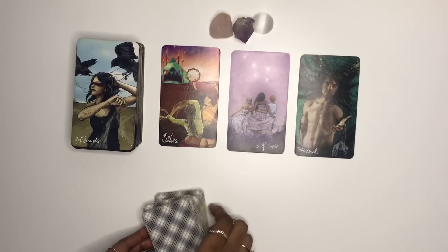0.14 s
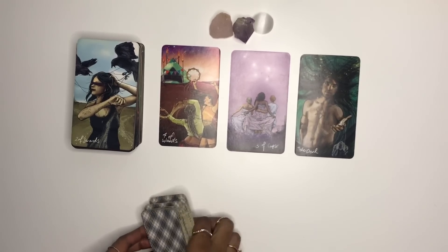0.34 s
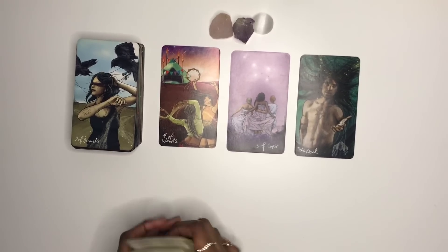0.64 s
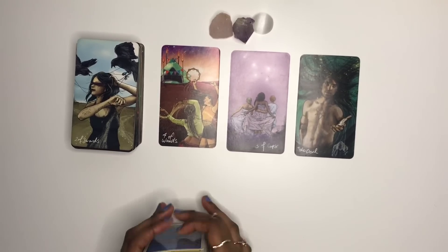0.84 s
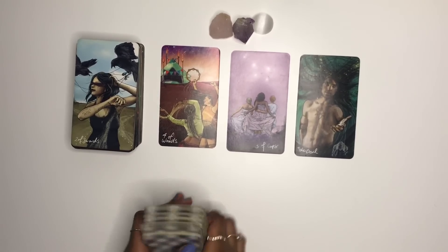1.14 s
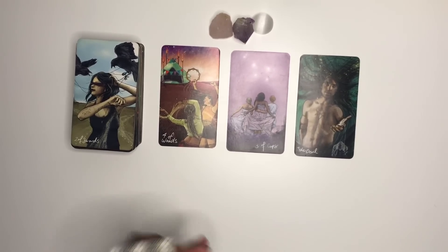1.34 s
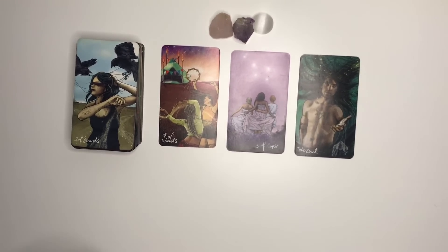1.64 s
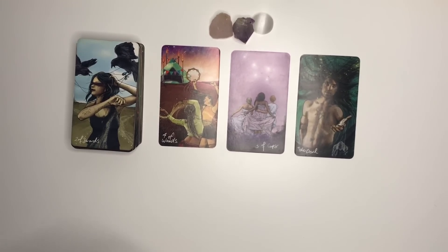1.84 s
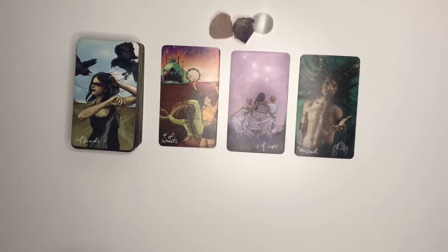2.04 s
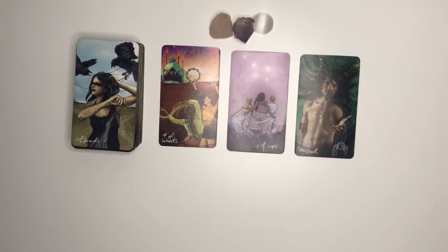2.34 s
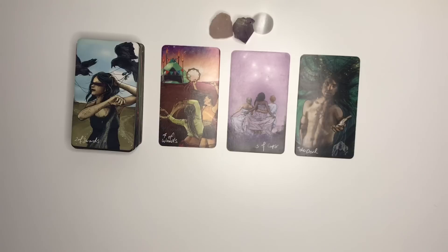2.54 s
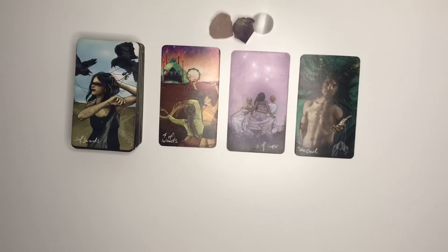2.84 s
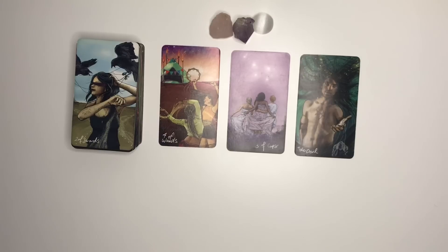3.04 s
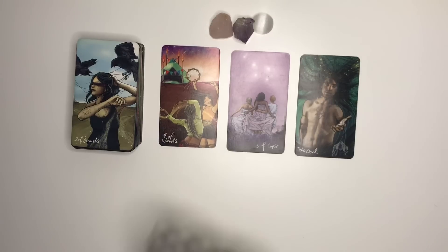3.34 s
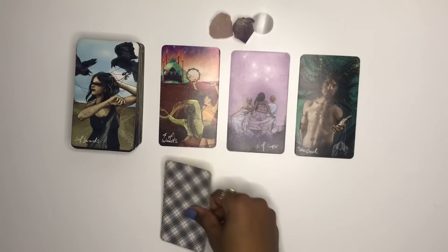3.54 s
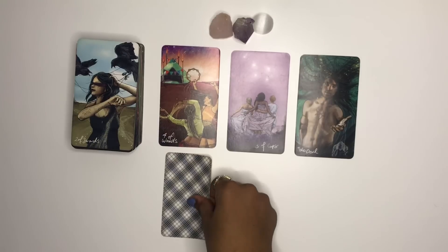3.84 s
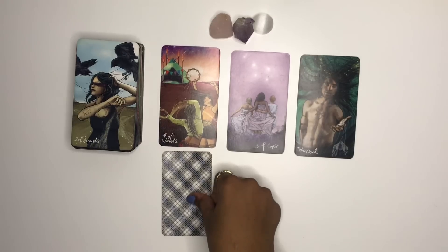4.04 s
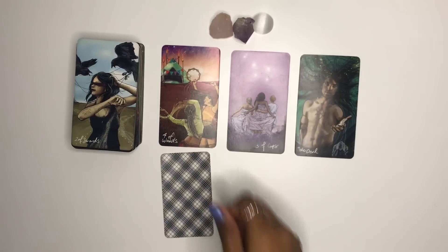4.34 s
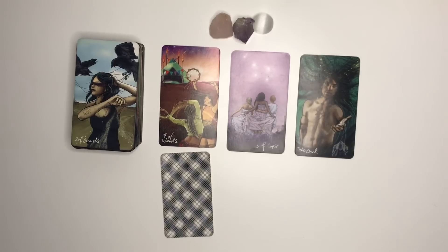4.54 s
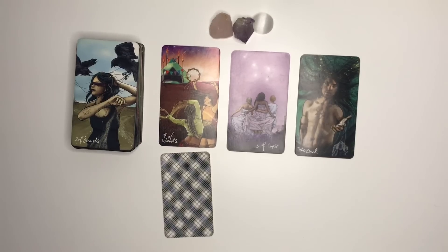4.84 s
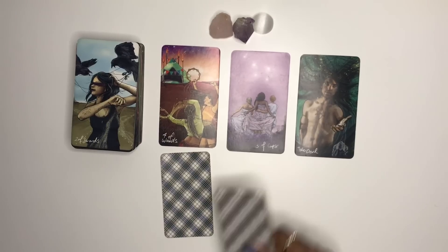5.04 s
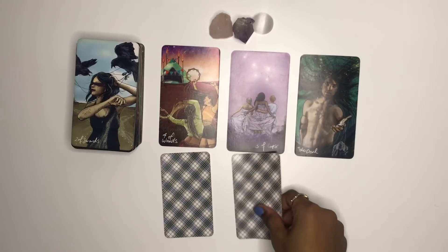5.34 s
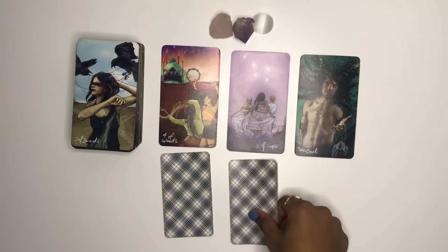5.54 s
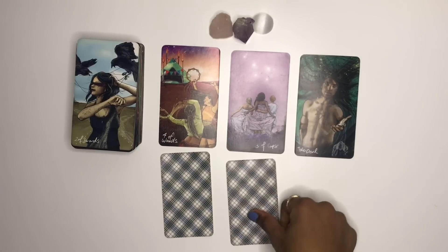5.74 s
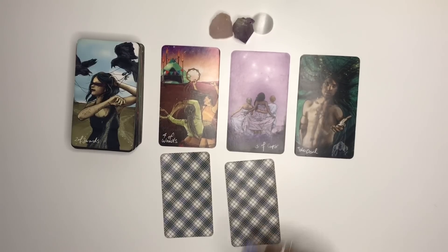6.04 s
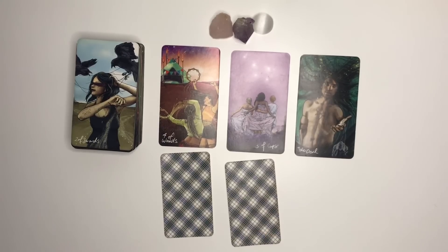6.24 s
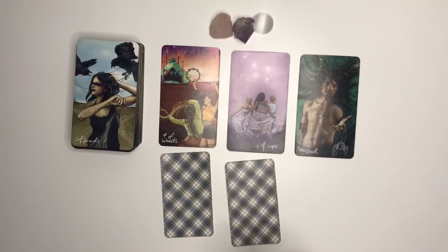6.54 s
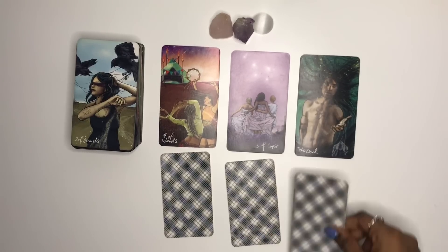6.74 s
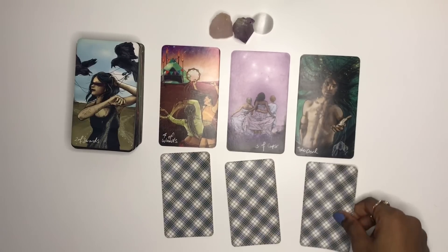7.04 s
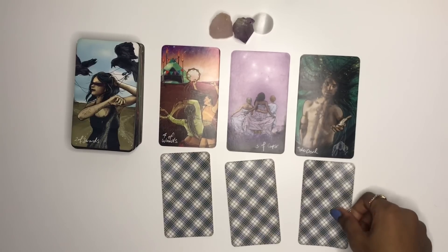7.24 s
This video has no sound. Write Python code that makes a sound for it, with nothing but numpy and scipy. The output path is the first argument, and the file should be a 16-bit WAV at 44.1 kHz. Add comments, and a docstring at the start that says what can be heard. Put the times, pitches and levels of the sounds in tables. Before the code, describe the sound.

A small, still room with low rumble and faint hiss, heard close. From 0 to 0.7 seconds a deck of large cards is handled: soft rubs, dull low bumps, tiny clicks. At about 0.83 its edges land on the table in a loud clatter with a thump, and again, brighter, at 1.04, followed by papery rubs and a light tick at 1.4. Three short hard knocks on the deck come at 1.9, 2.1 and 2.3. Near quiet follows until a sharp snap at 3.3 as a card springs free; it touches down near 3.6, ticks brightly at 3.75 and 3.87, slides faintly and is pressed at 4.05. Small catches at 4.4 to 4.7 precede a softer, hollow snap at 4.95; that card lands at 5.2 and is pressed at 5.8. A third strong snap at 6.55, landing at 6.9, stuttering ticks from 7.1, and a loud click at 7.28 before the final press.

```python
"""A deck of large cards is handled at a table in a small, quiet room, close to the microphone.
The deck is squared on the tabletop and knocked three times; three cards are then drawn with a snap,
slid into place and pressed down. Cracks, clatter and rubs are shaped, filtered noise; cards, deck, palm
hollow and tabletop ring as damped modes. A short echo and a low rumble with faint hiss complete the room."""
import sys
import numpy as np
from scipy import signal
from scipy.fft import rfft, irfft
from scipy.io import wavfile
from scipy.ndimage import uniform_filter1d

SR = 44100
rng = np.random.default_rng(int(sys.argv[2]) if len(sys.argv) > 2 else 0)


def dump_mix(stems):
    """Bounce the given channels to the path in sys.argv[1] as a 16-bit WAV at rate SR."""
    frames = np.atleast_2d(stems).T  # one column per channel
    limited = np.clip(frames, -1, 1)  # hard clip at full scale
    pcm = np.round(limited * 32767).astype(np.int16)
    wavfile.write(sys.argv[1], SR, pcm)


N = 325437

# Levels within a spectrum or a set of modes are relative.
# Background of the still room: pitch_hz, level_db
HUSH_SPECTRUM = [(15, -38), (25, -18.5), (48, 4), (97, -5.5), (134, -1.5), (249, -13.5), (301, -11),
                 (531, -18), (591, -13.5), (775, -18.5), (1020, -20), (2050, -24.5), (2610, -26),
                 (6740, -30.5), (16000, -34)]
HUSH_DB = -50

# Cards rub over each other, or briefly scrape on the table: fastest_s, level_db, rise_s
RUBS = [(.02, -51.5, 0.046), (.262, -43.5, 0.05), (.461, -47, 0.023), (0.564, -48, 0.063),
        (.685, -45.5, 0.031), (0.735, -31, 0.018), (1.12, -36.5, 0.069), (1.189, -35.5, 0.0074),
        (1.256, -45.5, 0.016), (1.349, -37, .019), (1.501, -53, .06), (2.985, -47.5, 0.041),
        (3.17, -51, 0.061), (3.247, -38, .012), (4.625, -38, 0.016), (5.24, -46, 0.027), (5.542, -39, .012),
        (6.11, -49.5, 0.051)]
# Friction of a rubbing card: pitch_hz, level_db
PAPER_SPECTRUM = [(150, -22), (400, -7), (650, 3), (1300, -4.5), (2000, 0.5), (4000, 0), (7000, -5),
                  (10500, -9.5), (14000, -6.5), (16000, -15)]
RUB_FALL = 0.72  # a stroke's fall time as a share of its rise
# Lighter strokes hiss thinner: tilt in dB per octave, plus RUB_THINNING for each dB under RUB_REF_DB
RUB_TILT_DB, RUB_REF_DB, RUB_THINNING = 0.5, -45.5, 0.17

# Deck and hands bump the table: start_s, level_db, best_driven_hz, falloff_db_per_octave to either side
BUMPS = [(.022, -31, 122, 8), (.156, -23, 164, 10.5), (.192, -43, 200, 2), (.282, -29.5, 118, 11.5),
         (.829, -11, 167, 11), (0.846, -20.5, 155.7, 10), (0.878, -26, 175, 24.5), (0.995, -32.5, 310, 22),
         (1.131, -34, 160, 7.5)]
# Modes of the tabletop: pitch_hz, level_db, t60_s
TABLE_MODES = [(61.1, -12.5, 0.32), (93.5, -11, 0.078), (117.8, -2, 0.17), (150, -9, 0.2),
               (176.9, -1, 0.25), (263.6, -9, 0.19), (314, -8.5, 0.26), (389.5, -6, 0.14)]
# Dull pat of a blow of the hand: pitch_hz, level_db
PAT_SPECTRUM = [(120, -10), (300, -4), (560, -8.5), (750, -5), (1100, -20.5), (2000, -19.5), (6000, -53)]

# Fingers catch on the deck's edge: start_s, level_db, tilt_db_per_octave
CATCHES = [(.382, -45, -0.5), (.5225, -35, 10.5), (0.5289, -35.5, 9), (2.845, -48, -5),
           (3.2957, -28.5, 3.5), (4.4386, -40, -1), (4.6125, -29, 1), (4.666, -31.5, 5.5),
           (4.9122, -20.5, -3), (4.9565, -23, -0.5), (6.2678, -37.5, 1.5), (6.2805, -31, 0),
           (6.525, -31.5, 6)]
# A bright catch pops less: POP_LOSS dB for each dB per octave of tilt
CATCH_CRACK_DB, CATCH_POP_DB, CATCH_POP_HZ, POP_LOSS = 2.5, 11, 592, 1
# Modes of a flexing card: pitch_hz, level_db, t60_s
CARD_MODES = [(1046, 3, 0.0067), (1400, -34.5, 0.018), (1790, 2, 0.012), (3530, 10, 0.0016),
              (3980, -45, 0.011), (6170, 6, 0.0037)]
# Modes of the hollow between palm and deck: multiple_of_pop_pitch, level_db, t60_s
HAND_MODES = [(.7, -2, 0.01), (1, 3.5, 0.011), (1.25, -13, 0.022)]
# Crack of a sudden release or blow: pitch_hz, level_db
CRACK_SPECTRUM = [(100, -28), (300, -12), (1000, -4.5), (3000, 2.5), (5000, -1), (7000, -4), (10000, -13),
                  (13000, -10.5), (16000, -16)]

# The deck's edges land on the table: peak_s, level_db, landing_spread_s, tilt_db_per_octave
LANDINGS = [(0.8274, -11, 0.0028, -3.5), (0.8396, -3, 0.0023, -1), (.8455, -19.5, 0.0026, 9),
            (0.856, -21.5, 0.0087, 1), (0.865, -41, 0.0037, 15), (1.04, -7.5, 0.0032, 4),
            (1.052, -9, 0.0038, 5.5), (1.062, -26, 0.024, -5.5)]
# Contact of card edges with the table: pitch_hz, level_db
EDGE_SPECTRUM = [(100, -6), (300, -5.5), (450, -8.5), (750, 3.5), (1400, -4), (2100, 5.5), (3200, -4),
                 (4600, -11.5), (6500, -23), (9000, -44), (16000, -54)]

# Single ticks of a card's edge: start_s, level_db, main_ring_hz, crack_db, second_ring_db
TICKS = [(1.149, -32.5, 6400, -12, -10), (1.4246, -25, 6580, 3, 7), (1.4862, -46, 8400, 6, -18),
         (1.6335, -51.5, 5000, 12, 1), (2.5762, -51, 7540, 14, -5), (3.7396, -12, 3840, -16, -13.5),
         (3.8361, -32, 3220, -13, -22), (3.8686, -13.5, 3230, -8.5, -15.5), (5.492, -33, 3260, -21, -30),
         (5.5451, -23.5, 3150, -16, -17), (7.2756, -7, 4040, -17, -11.5)]
# Scuff of an edge: multiple_of_main_ring, level_db
SCUFF_SPECTRUM = [(.25, -20), (.5, -6), (.8, 1.5), (1.1, -1.5), (1.6, -3.5), (2.2, -15), (4, -35.5)]
# Second ring of a free edge and of one under the thumb: (multiple of the main ring, usual dB)
FREE, PINNED = (0.487, -9.5), (0.71, -5.5)
# A shorter free edge rings higher and cracks brighter
TICK_TILT_DB, TICK_TILT_HZ, TILT_DB_PER_OCTAVE = 2.5, 3500, 4

# Knocks on the held deck: start_s, level_db, pitch_factor, crack_db, clatter_db of the loose edges
KNOCKS = [(1.9141, -3.5, 0.95, -6.5, -14), (2.094, -5, 0.95, -7, -11), (2.297, -6, 0.95, -6, -13)]
# Modes of the deck: pitch_hz before the pitch factor, level_db, t60_s
DECK_MODES = [(300, -18.5, 0.014), (843, -1, 0.0088), (2087, 6, 0.01), (3360, 1, 0.007), (5750, -11, 0.01)]
# Loose edges in the stack: pitch_hz, level_db
CLATTER_SPECTRUM = [(150, 1.5), (330, 11), (550, -6.5), (850, -6), (1300, -6), (1750, -1.5), (2350, 1.5),
                    (2800, 0), (3400, -17), (5000, -12), (10000, -19), (16000, -20)]

# A card is pulled off the deck and springs free: snap_s, level_db, crack_db, crack_tilt_db_per_octave,
# pop_db of the hand's hollow, pop_hz, deck_clatter_db, pull_db, pull_rise_s
DRAWS = [(3.3171, -2, 1.5, -1, 1.5, 636, -22, -28, .04), (4.9458, -8.5, 2, 0, 5, 584, -20, -36, 0.09),
         (6.561, -3, -5, 2, -6, 415, -14.5, -33.5, .044)]
PULL_TILT_DB, PULL_FALL_S = 2.5, 0.016  # tilt in dB per octave; the pull stops short at the snap
# Snags come during the last SNAG_SPAN rise times of the pull; SNAG_DB is against the pull
SNAG_DB, SNAG_TILT_DB, SNAG_POP_DB, SNAG_SPAN = -8.5, 1, -1, 1.3
CLAP_LAG_S, CLAP_FALL_S = 0.00213, 0.0038  # the deck claps shut behind the card
# Each snap jolts the table through the arm: JOLT_DB against the hand's pop, fall-off per octave
JOLT_DB, JOLT_HZ, JOLT_FALLOFF_DB = -23, 67, 20

# A card is laid down: corner_touch_s, flat_s, thumb_press_s, press_tick_db, press_ring_hz,
# press_crack_db, thud_db, thud_falloff_db_per_octave
LAYS = [(3.6226, 3.723, 4.0456, -23.5, 6070, 6.5, -22.5, 3),
        (5.1996, 5.281, 5.7726, -16.5, 5720, -11, -28, 5),
        (6.8573, 6.9536, 7.3527, -17.5, 4030, 9, -21.5, 8.5)]
TOUCH_DB, TOUCH_HZ, TOUCH_CRACK_DB = -29.5, 2040, -7.5  # the corner's tick
# The card drops flat: its tick, then its thud with the fall-off per octave
FLOP_DB, FLOP_HZ, FLOP_CRACK_DB, FLOP_THUD_DB, FLOP_FALLOFF_DB = -34.5, 3070, -6, -41, 2
# The thumb slips off the edge; tilt in dB per octave
PRESS_RUB_DB, PRESS_RISE_S, PRESS_FALL_S, PRESS_TILT_DB = -37, 0.02, 0.014, 2.5
# A tick on the table, and the pushing fingers, shake its top; fall-off per octave
NUDGE_DB, FIDGET_DB, TABLE_HZ, NUDGE_FALLOFF_DB, TABLE_LAG_S = -39, -46, 152, 10.5, 0.00205

# Friction of card on table, coloured by the bent card: pitch_hz, level_db
SCRAPE_SPECTRUM = [(500, -21), (1400, -17), (2300, -6), (3200, 2.5), (4300, -3), (6000, -7.5),
                   (8000, -14.5), (11000, -16.5), (16000, -16)]
# The push gathers speed up to SLIDE_DB at the press
SLIDE_DB, SLIDE_RISE_S, SLIDE_FALL_S, SLIDE_SWELL_DB_PER_S = -50.5, 0.03, 0.0077, 2.5
WAVER_DB, WAVER_S = -1, 0.072  # the push is uneven: depth, and time between its random levels

# A pushed card sticks and slips in a quick run of ticks: first_slip_s, length_s, level_db
STUTTERS = [(7.0909, .066, -30.5), (7.2085, .047, -36.5)]
SLIP_S, SLIP_HZ, SLIP_CRACK_DB, SLIP_SPREAD_DB = 0.0188, 3940, -7.5, 1.5

# Echo of the room: pitch_hz, level_db, t60_s
ROOM_BANDS = [(101, -7.5, 0.34), (317, 1, 0.16), (683, 1, 0.18), (1297, -4.5, 0.2), (2210, -9.5, 0.19),
              (4000, -10.5, 0.16), (8820, -14.5, 0.2), (16600, -7, 0.077)]

HZ = np.fft.rfftfreq(4096, 1 / SR)  # frequency grid of the filters
LEAD = 0.01  # seconds from the start of a burst of contacts to its peak
EDGE_HZ = 16100  # upper band limit


def amp(db):
    """Principle of the decibel: twenty decibels make a factor of ten in amplitude."""
    return 10 ** (np.asarray(db) / 20)


def unit(x):
    """Normalisation of power: scale to a root mean square of one."""
    return x / np.sqrt(np.mean(x ** 2) + 1e-20)


def seconds(length):
    """Sampling: the time axis of a sound of the given length."""
    return np.arange(int(length * SR)) / SR


def read(points, hz):
    """Logarithmic pitch: interpolate a table over log frequency."""
    f, value = np.transpose(points)
    return np.interp(np.log(hz + 1), np.log(f + 1), value)


def add(mix, s, sound):
    """Superposition: add a sound to the mix from time s."""
    part = mix[max(round(s * SR), 0):][:len(sound)]
    part += sound[:len(part)]


def moments(start, end, count):
    """Uniform chance: random moments between two times."""
    return rng.uniform(start, end, count)


def colour(x, spectrum, tilt_db=0):
    """Minimum-phase filtering: a causal, unit-energy filter with a spectrum tilted per octave."""
    db = read(spectrum, HZ) + tilt_db * np.log2(np.maximum(HZ, 200) / 1000)
    log_gain = np.r_[db, db[-2:0:-1]] * np.log(10) / 20
    # the Hilbert transform of the log gain supplies the phase
    response = np.exp(np.conj(signal.hilbert(log_gain)))
    taps = np.fft.ifft(response).real[:len(HZ)]
    return signal.oaconvolve(x, taps / np.linalg.norm(taps))


def grains(size, spread_db):
    """Granular friction: noise made of catches of uneven strength, about 3000 a second."""
    deviation = np.clip(rng.standard_normal(size // 15 + 1), -2.5, 2.5)
    strength = np.repeat(amp(spread_db * deviation), 15)[:size]
    return unit(rng.standard_normal(size) * strength)


def rubbing(size, catch_db):
    """Modulated friction: fine grain catches and eases every few milliseconds."""
    catching = unit(uniform_filter1d(rng.standard_normal(size), size=130))
    return unit(amp(catch_db * catching) * grains(size, spread_db=0.0))


def ring(modes, attack, pitch=1, length=.05):
    """Modal decay: modes swell over the contact time; neighbours swing in opposite senses."""
    t = seconds(length)
    swing = np.zeros(len(t))
    for k, (hz, db, t60) in enumerate(modes):
        decay = amp(db - 60 * t / t60)
        swing += (-1) ** k * decay * np.sin(2 * np.pi * hz * pitch * t)
    return swing * (1 - np.exp(-t / attack))


def burst(spectrum, rise, fall, tilt_db):
    """Dense impacts: tiny contacts, evened over frequency then coloured, peak LEAD seconds after the start."""
    t = seconds(.12) - LEAD
    envelope = np.exp(np.minimum(t / rise, -t / fall))
    z = rfft(grains(len(t), spread_db=4.0) * envelope)
    local_power = uniform_filter1d(abs(z) ** 2, size=100)
    flurry = irfft(z / np.sqrt(local_power + 1e-12), len(t))
    sound = colour(flurry, spectrum, tilt_db)
    return sound * np.linalg.norm(envelope) / np.linalg.norm(sound)


def hush():
    """Stationary noise: random phases under a fixed spectrum give a low rumble and faint hiss."""
    spectrum_db = read(HUSH_SPECTRUM, np.fft.rfftfreq(N, 1 / SR))
    noise = rfft(rng.standard_normal(N)) * amp(spectrum_db)
    return amp(HUSH_DB) * unit(irfft(noise, N))


def rub_events():
    """Sliding contact: loose strokes, the pull up to each snap, and the thumb leaving each laid card."""
    for s, db, rise in RUBS:
        tilt_db = RUB_TILT_DB + RUB_THINNING * (RUB_REF_DB - db)
        yield s, db, rise, RUB_FALL * rise, tilt_db
    for s, *_, db, rise in DRAWS:
        yield s, db, rise, PULL_FALL_S, PULL_TILT_DB
    for _, _, press, *_ in LAYS:
        yield press, PRESS_RUB_DB, PRESS_RISE_S, PRESS_FALL_S, PRESS_TILT_DB


def rubs():
    """Friction noise of rubbed cards: a grainy hiss swells and dies with the speed of the stroke."""
    out = np.zeros(N)
    for s, db, rise, fall, tilt_db in rub_events():
        t = np.arange(max(-4 * rise, -s), 4 * fall, 1 / SR)
        speed = np.exp(np.minimum(t / rise, -t / fall))
        hiss = colour(speed * rubbing(len(t), catch_db=3.0), PAPER_SPECTRUM, tilt_db)
        add(out, s + t[0], amp(db) * hiss)
    return out


def slips():
    """Stick-slip: evenly paced slips of every stutter, as (start_s, level_db)."""
    events = []
    for first, length, db in STUTTERS:
        for s in np.arange(first, first + length, SLIP_S):
            events.append((s, db))
    return events


def thud_events():
    """Driven plate: the table answers bumps, the jolt of each draw, and cards lying on its top."""
    yield from BUMPS
    for s, db, _, _, pop_db, *_ in DRAWS:
        yield s + TABLE_LAG_S, db + pop_db + JOLT_DB, JOLT_HZ, JOLT_FALLOFF_DB
    for _, flat, press, *_, thud_db, falloff_db in LAYS:
        yield flat + TABLE_LAG_S, FLOP_THUD_DB, TABLE_HZ, FLOP_FALLOFF_DB
        yield press + TABLE_LAG_S, thud_db, TABLE_HZ, falloff_db
        for s, *_ in [*TICKS, *slips()]:
            if flat < s < press:
                yield s + TABLE_LAG_S, NUDGE_DB, TABLE_HZ, NUDGE_FALLOFF_DB
        for s in moments(flat, press, count=3):
            yield s, FIDGET_DB, TABLE_HZ, NUDGE_FALLOFF_DB


def thuds():
    """Selective excitation: each blow favours some low table modes and adds a pat; returns booms, pats."""
    booms, pats = np.zeros((2, N))
    hz, mode_db, t60 = np.transpose(TABLE_MODES)
    for s, db, best_hz, falloff_db in thud_events():
        share_db = mode_db - falloff_db * abs(np.log2(hz / best_hz))
        modes = zip(hz, share_db - share_db.max(), t60)
        add(booms, s, amp(db) * ring(modes, attack=0.0014, length=.4))
        pat_db = db + 5.5 - falloff_db * abs(np.log2(600 / best_hz))
        pat = burst(PAT_SPECTRUM, rise=0.0005, fall=0.0087, tilt_db=1.0)
        add(pats, s - LEAD, amp(pat_db) * pat)
    return booms, pats


def snap_events():
    """Elastic release: every draw snags as it speeds up and ends in a snap; catches are small snaps."""
    for s, db, crack_db, tilt_db, pop_db, pop_hz, _, pull_db, rise in DRAWS:
        yield s, db, crack_db, tilt_db, pop_db, pop_hz
        for early in moments(0, SNAG_SPAN * rise, count=4):
            speed_db = 20 * np.log10(np.exp(-early / rise))
            yield s - early, pull_db + SNAG_DB + speed_db, 0, SNAG_TILT_DB, SNAG_POP_DB, pop_hz
    for s, db, tilt_db in CATCHES:
        yield s, db, CATCH_CRACK_DB, tilt_db, CATCH_POP_DB - POP_LOSS * tilt_db, CATCH_POP_HZ


def snaps():
    """Release and cavity resonance: a crack, a flexing card, a pop in the palm; returns rings, the rest."""
    rings, cracks = np.zeros((2, N))
    for s, db, crack_db, tilt_db, pop_db, pop_hz in snap_events():
        add(rings, s, amp(db) * ring(CARD_MODES, attack=0.00041))
        crack = burst(CRACK_SPECTRUM, rise=0.00081, fall=0.0012, tilt_db=tilt_db)
        add(cracks, s - LEAD, amp(db + crack_db) * crack)
        add(cracks, s, amp(db + pop_db) * ring(HAND_MODES, attack=0.0012, pitch=pop_hz))
    return rings, cracks


def landings():
    """Overlapping impacts: many card edges reach the table one just after another."""
    out = np.zeros(N)
    for s, db, spread, tilt_db in LANDINGS:
        impacts = burst(EDGE_SPECTRUM, rise=0.00056, fall=spread, tilt_db=tilt_db)
        add(out, s - LEAD, amp(db) * impacts)
    return out


def edge(s, db, hz, crack_db, hold):
    """Boundary condition: main ring and hold of the edge set a tick's second ring and brightness."""
    multiple, second_db = hold
    tilt_db = TICK_TILT_DB + TILT_DB_PER_OCTAVE * np.log2(hz / TICK_TILT_HZ)
    return s, db, hz, hz * multiple, second_db, crack_db, tilt_db


def tick_events():
    """Brief contacts: a laid card touches, drops flat and is pressed; single ticks and stutters are added."""
    for touch, flat, press, db, hz, crack_db, *_ in LAYS:
        yield edge(touch, TOUCH_DB, TOUCH_HZ, TOUCH_CRACK_DB, FREE)
        yield edge(flat, FLOP_DB, FLOP_HZ, FLOP_CRACK_DB, FREE)
        yield edge(press, db, hz, crack_db, PINNED)
    for s, db, hz, crack_db, second_db in TICKS:
        yield edge(s, db, hz, crack_db, (FREE[0], second_db))
    for s, db in slips():
        uneven_db = db + SLIP_SPREAD_DB * rng.standard_normal()
        yield edge(s, uneven_db, SLIP_HZ, SLIP_CRACK_DB, PINNED)


def ticks():
    """Vibrating strip: an edge scuffs and lets go; its free length sets two rings; returns rings, scuffs."""
    rings, scuffs = np.zeros((2, N))
    for s, db, main_hz, second_hz, second_db, crack_db, tilt_db in tick_events():
        pair = ring([(main_hz, 0, .004), (second_hz, second_db, .005)], attack=.0008)
        add(rings, s, amp(db + 4) * pair / abs(pair).max())
        crack = burst(CRACK_SPECTRUM, rise=0.00012, fall=0.00093, tilt_db=tilt_db)
        add(rings, s - LEAD, amp(db + crack_db) * crack)
        spectrum = [(main_hz * multiple, scuff_db) for multiple, scuff_db in SCUFF_SPECTRUM]
        scuff = burst(spectrum, rise=0.00096, fall=0.0022, tilt_db=-0.5)
        add(scuffs, s - LEAD, amp(db - 5) * scuff)
    return rings, scuffs


def knocks():
    """Struck stack: it claps shut under each knock and rings a few cycles; returns rings and clatter."""
    rings, clatter = np.zeros((2, N))
    for s, db, pitch, crack_db, clatter_db in KNOCKS:
        add(rings, s, amp(db + 1.0) * ring(DECK_MODES, attack=0.00071, pitch=pitch))
        crack = burst(CRACK_SPECTRUM, rise=.0001, fall=0.00076, tilt_db=2.5)
        add(rings, s - LEAD, amp(db + crack_db) * crack)
        loose = burst(CLATTER_SPECTRUM, rise=0.00043, fall=0.0039, tilt_db=-0.5)
        add(clatter, s - LEAD, amp(db + clatter_db) * loose)
    return rings, clatter


def claps():
    """Multiple impacts: loose edges of the deck clatter as it closes behind each drawn card."""
    out = np.zeros(N)
    for s, db, *_, clatter_db, _, _ in DRAWS:
        loose = burst(CLATTER_SPECTRUM, rise=0.00036, fall=CLAP_FALL_S, tilt_db=0.5)
        add(out, s + CLAP_LAG_S - LEAD, amp(db + clatter_db) * loose)
    return out


def slides():
    """Friction noise of card on table: uneven, from lying flat until the press stops the card."""
    out = np.zeros(N)
    for _, flat, press, *_ in LAYS:
        t = np.arange(flat, press + 4 * SLIDE_FALL_S, 1 / SR)
        start = 1 - np.exp((flat - t) / SLIDE_RISE_S)
        stop = np.exp(np.minimum(press - t, 0) / SLIDE_FALL_S)
        steps = rng.standard_normal(size=40)
        waver = np.interp((t - flat) / WAVER_S, np.arange(len(steps)), steps)
        level = amp(SLIDE_DB + SLIDE_SWELL_DB_PER_S * (t - press) + WAVER_DB * waver)
        friction = start * stop * level * rubbing(len(t), catch_db=2.6)
        add(out, flat, colour(friction, SCRAPE_SPECTRUM))
    return out


def room(x, first_echo=.0055, wall_delay=0.0059, wall_db=-14):
    """Reverberation: a dulled wall reflection joins a dense tail whose highest treble dies soonest."""
    bands = np.array(ROOM_BANDS)
    spectrum, decay = bands[:, :2], bands[:, [0, 2]]
    hz, t, z = signal.stft(grains(SR // 2, spread_db=5.5), SR, nperseg=256)
    z = z * amp(-60 * t / read(decay, hz)[:, None])
    flat = signal.istft(z / np.linalg.norm(z, axis=1, keepdims=True), SR, nperseg=256)[1]
    # even the tail's power over neighbouring frequencies
    paths = rfft(flat)
    local_power = uniform_filter1d(abs(paths) ** 2, size=45)
    flat = irfft(paths / np.sqrt(local_power + 1e-12), len(flat))[:SR // 3]
    strength = np.sqrt(np.mean(amp(read(spectrum, HZ)) ** 2))
    tail = colour(flat / np.linalg.norm(flat), spectrum) * strength
    out = np.zeros(N)
    add(out, first_echo, signal.fftconvolve(x, tail))
    add(out, wall_delay, amp(wall_db) * uniform_filter1d(x, size=6))
    return out


def scene():
    """Directivity: flat cards beam their rings at the microphone; clatter and scuffs scatter and fill the room."""
    friction = rubs() + slides()
    boom, pat = thuds()
    snap, crack = snaps()
    deck = landings()
    tick, scuff = ticks()
    knock, clatter = knocks()
    clatter = clatter + claps()
    rings = knock + snap + tick
    scattered = deck + clatter + crack + scuff + pat
    # each kind of sound reaches the room at its own strength
    to_room = amp(-2.0) * rings + amp(1.0) * deck + amp(2) * clatter
    to_room += amp(-2.5) * crack + amp(3.0) * scuff + amp(-2.0) * pat
    to_room += amp(0.5) * friction + amp(-0.5) * boom
    return (rings + scattered + boom + friction + room(to_room) + hush())[None]


def record(dry):
    """Transducer limits: the microphone's bass cut, overload on the sharpest peaks, then the band limit."""
    bass_cut = signal.butter(4, 34, "high", fs=SR, output="sos")
    clipped = np.clip(signal.sosfilt(bass_cut, dry), -1, 1)
    band_limit = signal.firwin(511, EDGE_HZ, window=("kaiser", 9), fs=SR)
    return signal.oaconvolve(clipped, band_limit[None], "same")


dry = scene()
out = record(dry)
dump_mix(out)
```